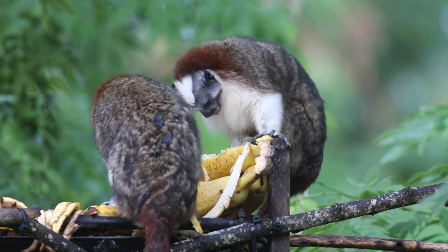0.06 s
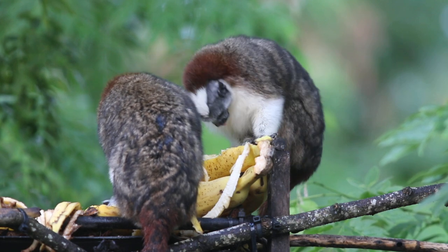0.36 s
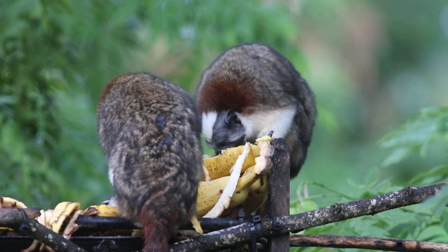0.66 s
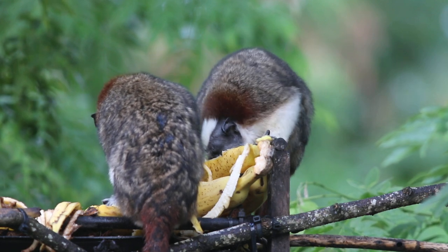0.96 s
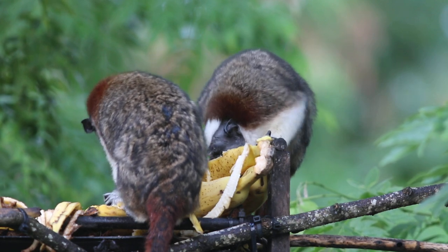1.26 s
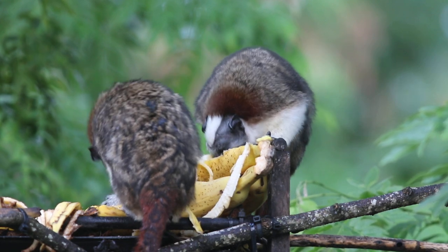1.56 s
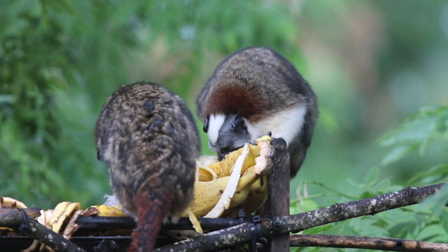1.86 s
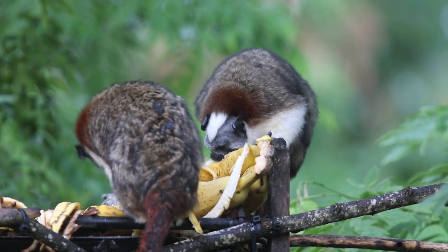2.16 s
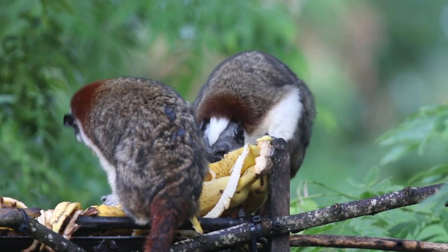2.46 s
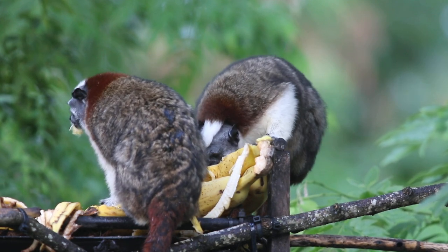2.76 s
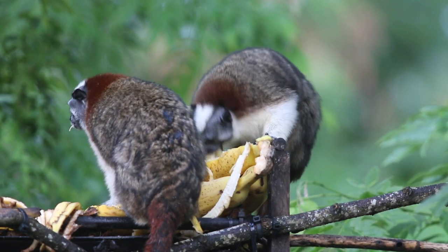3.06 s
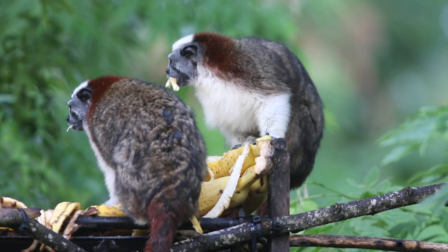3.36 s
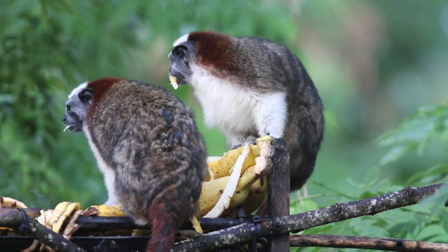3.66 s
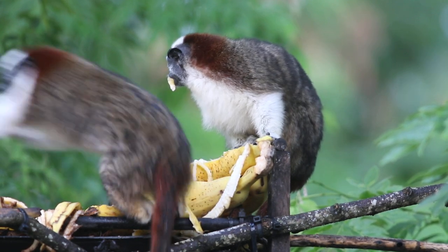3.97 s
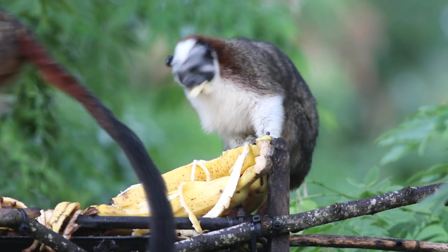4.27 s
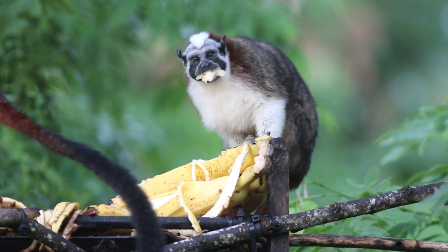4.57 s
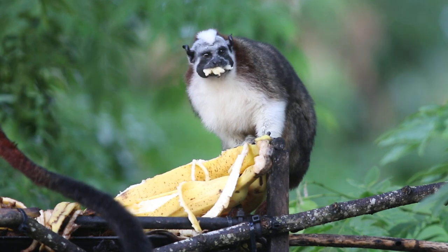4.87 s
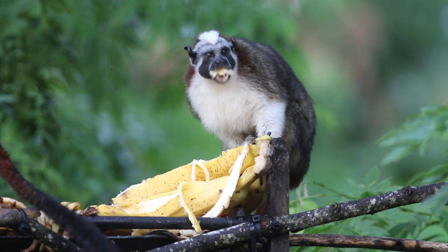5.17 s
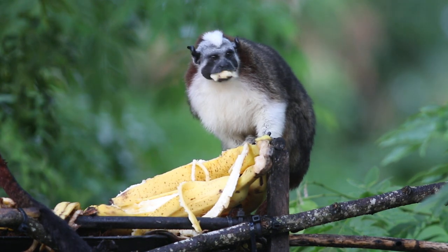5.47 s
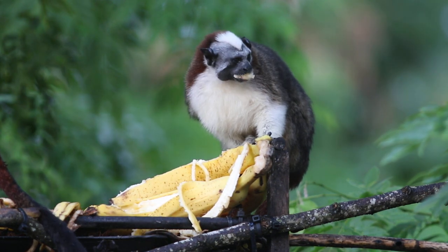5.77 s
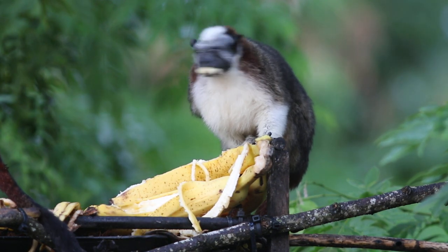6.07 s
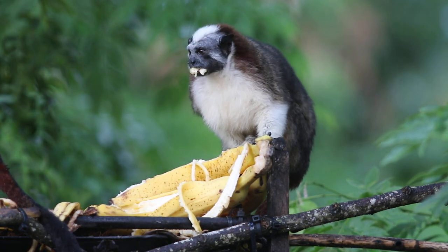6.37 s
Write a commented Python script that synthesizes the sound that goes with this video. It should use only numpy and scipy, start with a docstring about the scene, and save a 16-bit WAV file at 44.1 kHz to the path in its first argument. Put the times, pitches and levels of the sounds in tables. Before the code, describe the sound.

Small monkeys give a few thin, high, falling chirps while faint birds buzz and whistle over outdoor hiss and distant engine drone.

```python
"""Two tamarins feed at a forest edge and give thin chirps that hold high, then dive and turn harsh.
Small birds buzz and whistle further off, smeared by reflections from the foliage.
Twigs tick and leaves rustle as the animals move. Distant engines drone under a steady hiss. Mono."""
import sys
import numpy as np
from scipy import signal
from scipy.fft import rfft, irfft
from scipy.io import wavfile

SR = 44100
rng = np.random.default_rng(int(sys.argv[2]) if len(sys.argv) > 2 else 0)


def unload_audio(sound):
    """Save the sound as a 16-bit wav file, at the path given as the first command line argument."""
    columns = np.transpose(np.atleast_2d(sound))
    # keep every value between -1 and 1, then stretch to whole-number steps
    steps = np.round(np.clip(columns, -1, 1) * 32767)
    wavfile.write(sys.argv[1], SR, steps.astype(np.int16))


N = 283122
TIME = np.arange(N) / SR

# tamarin chirps: (time [s], mid-dive after [s], length [s], dive constant [s], opening rise [Hz],
# top [Hz], bottom [Hz], level before mouth [dB], harsh below [Hz], octave gain [dB])
TAMARIN_CHIRPS = [(.1455, .0300, .043, .004, 0, 7720, 2400, -19, 6400, -8),
                  (.590, .021, .034, .004, 0, 8200, 3700, -55, 6500, -8),
                  (.700, .037, .050, .004, 0, 7550, 3800, -63, 8500, 7),
                  (2.581, .017, .018, .0012, 330, 9270, 7000, -39, 6500, -30),
                  (2.951, .030, .033, .0013, 330, 9060, 7000, -35, 6500, -30),
                  (4.030, .017, .030, .004, 0, 8500, 3400, -51, 6500, -14),
                  (5.934, .050, .066, .0045, 350, 9000, 1900, -39.5, 8200, 0)]
# mouth response: (frequency [Hz], gain [dB])
MOUTH_RESPONSE = [(1800, 2), (2700, -24.5), (3400, -22), (4300, -7.5), (5200, -13.5), (6600, -1.5),
                  (7700, -7), (9000, -6.5), (12000, -4), (16000, -14)]
# feeder and trunk reflections: (delay [s], gain [ratio])
REFLECTIONS = [(.0068, 0.3), (0.0107, 0.15)]
# far buzzing songs: (time [s], level [dB])
FAR_SONGS = [(1.005, -56), (4.465, -55.5)]
# far two-voiced slurs: (time [s], length [s], top [Hz], bottom [Hz], level [dB])
FAR_SLURS = [(2.55, .15, 6500, 4080, -62), (2.976, 0.12, 6500, 3640, -57), (3.252, .15, 7500, 4160, -59),
             (3.48, 0.16, 8300, 4010, -56), (3.783, .115, 7920, 3230, -57),
             (3.996, 0.12, 8330, 3210, -57.5)]
# far gliding chips: (time [s], length [s], first [Hz], last [Hz], level [dB])
FAR_CHIPS = [(1.875, 0.033, 6670, 8600, -58.5), (1.95, 0.043, 9800, 8050, -59.5),
             (1.992, .051, 7940, 7340, -48), (5.98, .10, 6040, 5560, -60)]
# far held notes: (time [s], length [s], pitch [Hz], level [dB], warble depth [Hz])
FAR_HELD = [(2.12, .087, 5550, -66, 199.3), (2.22, 0.056, 5460, -58.5, 70), (2.26, 0.064, 7540, -62, 60),
            (2.335, .045, 3820, -60, 150), (2.34, 0.047, 4800, -60, 500), (2.385, .057, 5500, -59, 130),
            (2.385, 0.065, 6560, -51.5, 282), (2.46, 0.1, 6720, -58, 450), (2.765, 0.18, 6600, -56, 172),
            (2.775, 0.22, 7360, -60, 850), (3.22, 0.07, 7400, -62, 110), (3.71, .09, 8850, -67, 150),
            (3.71, .042, 7370, -63, 80), (4.235, .05, 7930, -61.5, 250), (5.01, 0.037, 2500, -64, 30),
            (6.36, .055, 6500, -62, 150)]
# near low whistles: (time [s], length [s], first [Hz], last [Hz], level [dB])
NEAR_WHISTLES = [(1.553, .032, 2766, 2140, -54), (1.598, 0.017, 2700, 2150, -61),
                 (1.668, 0.023, 1730, 2420, -54), (1.688, 0.044, 2445, 2470, -52),
                 (1.745, .075, 2462, 2470, -58.5)]
# end of the climbing phrase: (time [s], length [s], pitch [Hz], level [dB], warble depth [Hz])
CLOSING_NOTES = [(5.447, 0.083, 5470, -54.5, 404), (5.585, 0.052, 4990, -58, 120)]
# twig ticks: (time [s], level before high-pass [dB], high-pass [Hz])
TWIG_TICKS = [(1.485, -60, 7000), (2.078, -57, 7000), (2.548, -53, 11000), (3.652, -52, 3500),
              (5.16, -56, 10000), (5.712, -55, 10500)]
# tick spectrum: (frequency [Hz], relative density [dB])
TICK_SPECTRUM = [(4000, -10), (6500, 7), (10000, -4), (15000, -9)]
# leaf rustles: (peak time [s], rise [s], fall [s], level [dB])
LEAF_RUSTLES = [(.61, 0.18, 0.1, -58.5), (4.33, .2, .2, -69), (6.36, .2, 0.17, -59)]
# rustle spectrum: (frequency [Hz], relative density [dB])
LEAF_SPECTRUM = [(800, -1.5), (1800, 2), (4000, -6.5), (7500, -0.5), (12000, -4.5), (15500, -13)]
# distant engines, one curve each: (time [s], pitch [Hz], level [dB])
ENGINE_CURVES = [
    [(0, 41.1, -60.5), (3.9, 40.6, -59.5), (4.25, 39.7, -67), (4.45, 41.6, -61.5), (4.8, 47.75, -72),
     (5.3, 44, -64), (5.55, 37, -59), (6.42, 33.5, -60)],
    [(0, 96.4, -67), (.7, 90, -70.5), (1.1, 92, -62.5), (1.4, 95.6, -65.5), (1.75, 97, -58.5),
     (2.8, 96.5, -56.5), (4.1, 99, -61), (5.0, 92.3, -65), (6.42, 91, -67)],
    [(3.4, 129, -77), (3.8, 129, -60.5), (5.3, 138, -67), (5.8, 150.4, -60), (6.42, 153.4, -59)],
]
# steady drone and whine: (pitch [Hz], level [dB], width [Hz])
DRONE_TONES = [(210, -60, 2), (266, -62, 4), (759, -71, 3), (1459, -78, 5), (2460, -80, 8), (2626, -75, 7),
               (3900, -75, 100)]
# far rumble and hiss: (frequency [Hz], relative density [dB])
AIR_SPECTRUM = [(22, -12), (50, -20.5), (75, -5.5), (110, -7), (150, 0), (250, 1), (330, -4), (410, -8.5),
                (600, -11.5), (900, -15.5), (1900, -21), (3200, -22.5), (5000, -25), (9000, -26.5),
                (15800, -35.5)]


def tamarins(rise_s=.007, fall_s=.006, harsh_ramp_hz=350):
    """Each chirp swells on its top pitch, then dives; the mouth colours each partial as it sweeps."""
    out = np.zeros(N)
    mouth_hz, mouth_db = np.transpose(MOUTH_RESPONSE)
    for s, hold_s, length_s, dive_s, rise_hz, top_hz, bottom_hz, db, harsh_hz, oct_db in TAMARIN_CHIRPS:
        t = TIME[:int(length_s * SR)]
        fallen = (1 + np.tanh((t - hold_s) / (2 * dive_s))) / 2
        hold_left = np.clip(1 - t / hold_s, 0, 1)
        hz = top_hz + (bottom_hz - top_hz) * fallen - rise_hz * hold_left ** 4
        first, second = [from_db(np.interp(k * hz, mouth_hz, mouth_db)) * tone(k * hz) for k in (1, 2)]
        harsh = np.clip((harsh_hz - hz) / harsh_ramp_hz, .02, 1)
        octave = from_db(oct_db) * harsh * (1 - fallen ** 10) * second   # gives out at the bottom
        add(out, s, from_db(db) * swell(t, rise_s, fall_s) * (first + octave))
    echoes = sum(gain * np.interp(TIME - delay_s, TIME, out) for delay_s, gain in REFLECTIONS)
    return out + echoes + from_db(-3.5) * foliage(out, t60_s=.37, build_s=.007)


def birds(notes, buzz_hz, octave_db, edge_s, bright_hz=5400, bright_width_hz=700):
    """Whistles bend through three pitches; a quick, uneven warble makes them buzz."""
    out = np.zeros(N)
    warble = tone(buzz_hz * (1 + .16 * drift(60))) / np.sqrt(2) + .244 * drift(500)
    for s, length_s, first_hz, middle_hz, last_hz, db, depth_hz in notes:
        t = TIME[:int(length_s * SR)]
        bend = np.polyfit([0, .5, 1], [first_hz, middle_hz, last_hz], 2)
        hz = np.polyval(bend, t / length_s) + depth_hz * np.interp(s + t, TIME, warble)
        # the beak passes the octave only around one pitch
        octave = from_db(octave_db) / (1 + ((hz - bright_hz) / bright_width_hz) ** 2) * tone(2 * hz)
        add(out, s, from_db(db) * swell(t, edge_s, edge_s) * (tone(hz) + octave))
    return out


def glide(s, length_s, first_hz, last_hz, db, depth_hz, midway=.46):
    """One bird note; `midway` is the share of the glide left at half time."""
    return s, length_s, first_hz, last_hz + midway * (first_hz - last_hz), last_hz, db, depth_hz


def held(rows):
    """Bird notes on one pitch each."""
    return [glide(s, length_s, hz, hz, db, depth_hz) for s, length_s, hz, db, depth_hz in rows]


def near_birds():
    """Low whistles and a climbing phrase, direct and off the leaves."""
    whistles = [glide(*row, depth_hz=12) for row in NEAR_WHISTLES]
    direct = birds(whistles + climbing_phrase(), buzz_hz=67.7, octave_db=-15, edge_s=.0045)
    return from_db(-3.5) * direct + from_db(-.5) * foliage(direct, t60_s=.71, build_s=.011)


def climbing_phrase(s=5.238, hz=5400, db=-53, scoop_s=.022, step_s=.074, step_hz=301, step_db=2.4):
    """A scoop, three steps, each higher, louder and rougher, then two sinking notes."""
    scoop = glide(s, scoop_s, hz - 650, hz, db - 4, depth_hz=12, midway=.33)
    steps = [(s + scoop_s + k * step_s, step_s, hz + k * step_hz, db + k * step_db, 120 + 25 * k)
             for k in range(3)]
    return [scoop] + held(steps + CLOSING_NOTES)


def far_birds():
    """Songs, slurs, chips and held notes; at this range more arrives by way of the leaves."""
    songs = [note for row in FAR_SONGS for note in buzz_song(*row)]
    slurs = [note for row in FAR_SLURS for note in slur(*row)]
    chips = [glide(*row, depth_hz=200, midway=.4) for row in FAR_CHIPS]
    direct = birds(songs + slurs + chips + held(FAR_HELD), buzz_hz=140.3, octave_db=-23, edge_s=.0033)
    return from_db(-6) * direct + from_db(-1) * foliage(direct, t60_s=.71, build_s=.0033)


def buzz_song(s, db, hz=7290, depth_hz=867, sag_hz=450, loud_s=.125, soft_s=.235):
    """A loud buzz, a softer sagging buzz, a short drop."""
    return [glide(s, loud_s, hz, hz, db, depth_hz),
            glide(s + loud_s, soft_s, hz, hz - sag_hz, db - 5.5, 1.12 * depth_hz),
            glide(s + loud_s + soft_s, .055, first_hz=5600, last_hz=4470, db=db - 3.5, depth_hz=150)]


def slur(s, length_s, top_hz, bottom_hz, db, break_hz=5010, landing_hz=748):
    """A warbling upper voice falls and levels out; a purer lower voice finishes the fall."""
    upper_s = .55 * length_s
    lower_s = length_s - upper_s
    return [glide(s, upper_s, top_hz, break_hz, db, depth_hz=222, midway=.3),
            glide(s + upper_s, lower_s, bottom_hz + landing_hz, bottom_hz, db - 4, 60, midway=.3)]


def twigs(decay_s=.031):
    """Dry ticks as the animals shift; thinner twigs tick higher."""
    out, crackle = np.zeros(N), noise(TICK_SPECTRUM)
    t = TIME[:SR // 10]
    for s, db, lowest_hz in TWIG_TICKS:
        snap = crackle[int(s * SR):][:len(t)] * np.exp(-t / decay_s)
        highpass = signal.butter(2, lowest_hz, "high", fs=SR, output="sos")
        add(out, s, from_db(db) * signal.sosfilt(highpass, snap))
    return out


def leaves(flicker_db=1.3):
    """Leaves stirred by the animals: swells of flickering noise."""
    stir = sum(from_db(db) * np.exp(-((TIME - s) / np.where(TIME < s, rise_s, fall_s)) ** 2)
               for s, rise_s, fall_s, db in LEAF_RUSTLES)
    return stir * from_db(flicker_db * drift(90)) * noise(LEAF_SPECTRUM)


def foliage(x, t60_s, build_s):
    """Dense reflections off leaves and trunks build and decay; unit-energy response."""
    t = TIME[:SR]
    build = 1 - np.exp(-(t / build_s) ** 2)
    tail = rng.standard_normal(SR) * from_db(-60 * t / t60_s) * build
    return signal.fftconvolve(x, tail / np.sqrt(np.sum(tail ** 2)))[:N]


def engines(waver_db=.18):
    """Distant engines: one low, wandering tone each."""
    out = np.zeros(N)
    for curve in ENGINE_CURVES:
        s, *columns = np.transpose(curve)
        hz, db = [np.interp(TIME, s, column) for column in columns]
        out += from_db(db + waver_db * drift(3.6)) * tone(hz)
    return out


def drones(waver_db=2.0):
    """Drone and whine: narrow tones wavering in pitch and level."""
    return sum(from_db(db + waver_db * drift(7.8)) * tone(hz + width_hz / 2 * drift(4 * width_hz))
               for hz, db, width_hz in DRONE_TONES)


def air(level_db=-50.5):
    """Steady far rumble and hiss."""
    return from_db(level_db) * noise(AIR_SPECTRUM)


def from_db(db):
    """Decibels to gain."""
    return 10 ** (np.asarray(db) / 20)


def rms_one(x):
    """Scale to rms 1."""
    return x / np.sqrt(np.mean(x ** 2) + 1e-20)


def add(out, s, sound):
    """Mix a sound in at time s."""
    start = max(0, int(s * SR))
    out[start:start + len(sound)] += sound[:max(0, N - start)]


def drift(rate_hz):
    """Random wander; rms 1."""
    knots = rng.standard_normal(int(rate_hz * N / SR) + 2)
    return rms_one(np.interp(TIME * rate_hz, np.arange(len(knots)), knots))


def noise(spectrum):
    """Shaped noise; rms 1."""
    hz, db = np.transpose(spectrum)
    bins_hz = np.maximum(np.arange(N // 2 + 1) * SR / N, 1)
    gain = from_db(np.interp(np.log(bins_hz), np.log(hz), db))
    return rms_one(irfft(rfft(rng.standard_normal(N)) * gain, N))


def tone(hz):
    """Sine on a pitch curve; rms 1."""
    return np.sqrt(2) * np.sin(2 * np.pi * np.cumsum(hz) / SR)


def swell(t, rise_s, fall_s):
    """Note envelope with rounded ends."""
    rise = np.sin(np.pi / 2 * np.clip(t / rise_s, 0, 1))
    fall = np.sin(np.pi / 2 * np.clip((t[-1] - t) / fall_s, 0, 1))
    return rise * fall


def scene():
    """All sources at one point; two identical channels."""
    mono = tamarins() + near_birds() + far_birds() + twigs() + leaves() + engines() + drones() + air()
    return np.array([mono, mono])


def record(dry):
    """Steep low-pass at 15.9 kHz."""
    return signal.sosfilt(signal.ellip(12, .1, 70, 15900, fs=SR, output="sos"), dry)


dry = scene()
out = record(dry)
unload_audio(out)
```